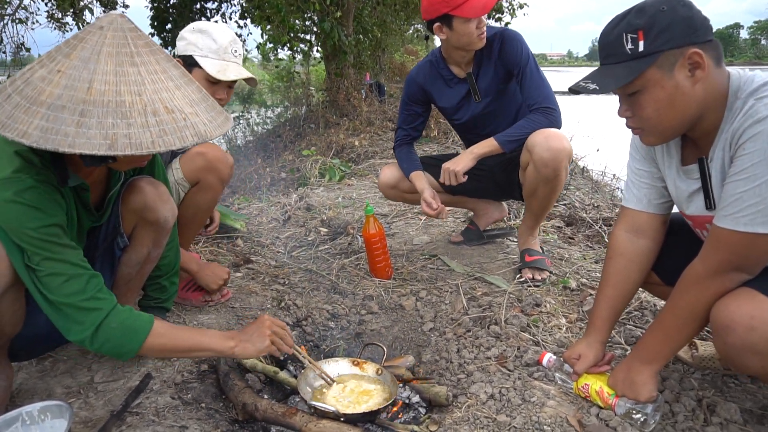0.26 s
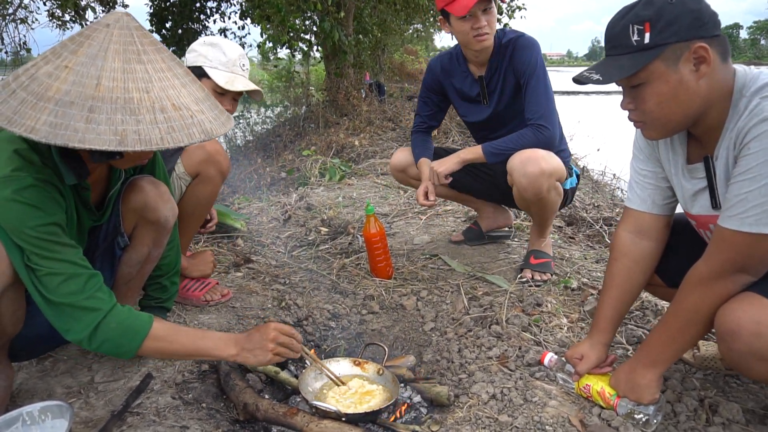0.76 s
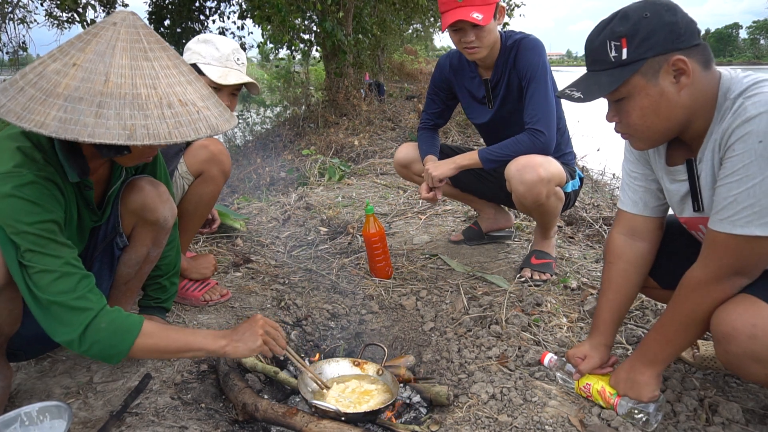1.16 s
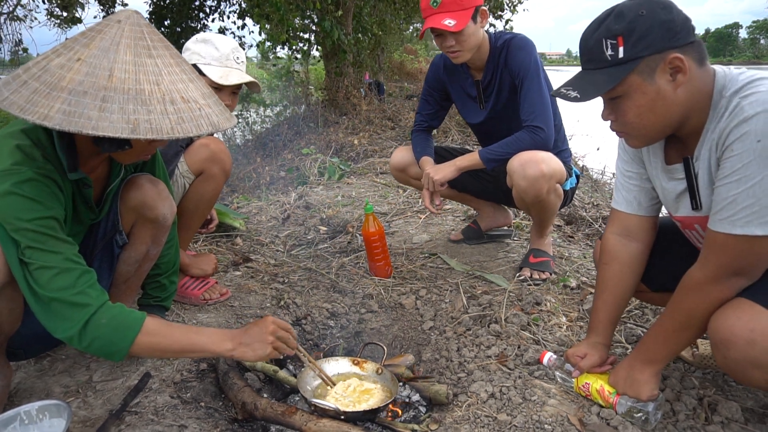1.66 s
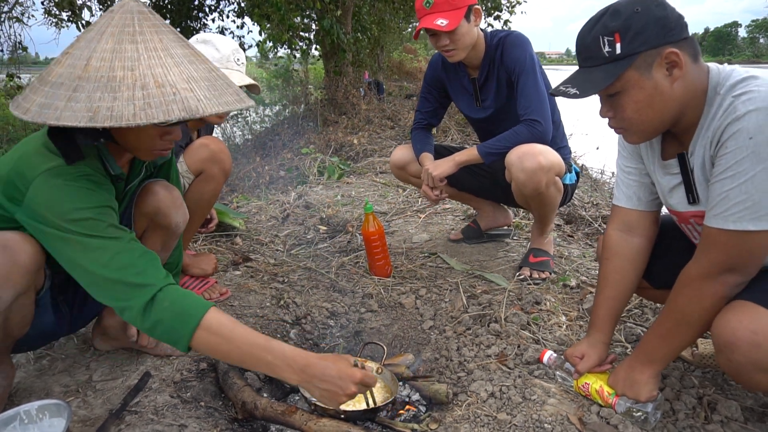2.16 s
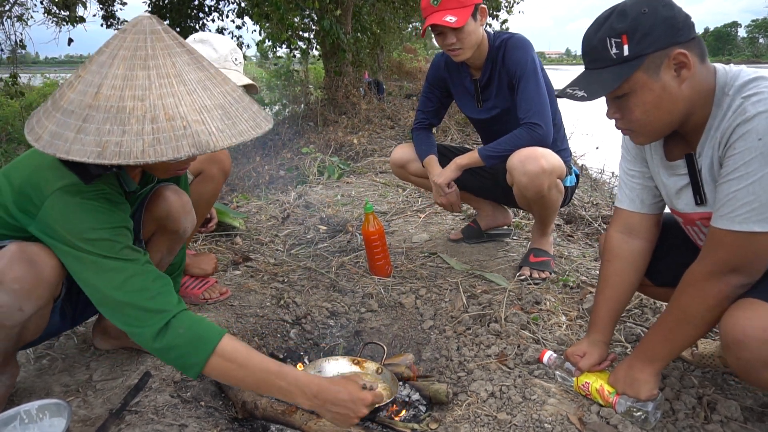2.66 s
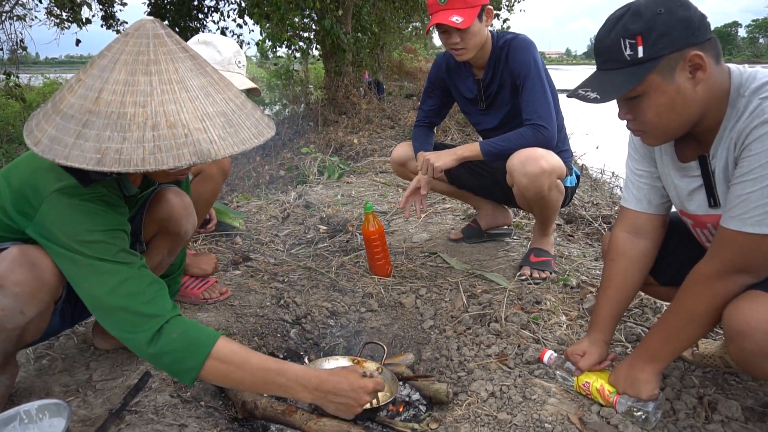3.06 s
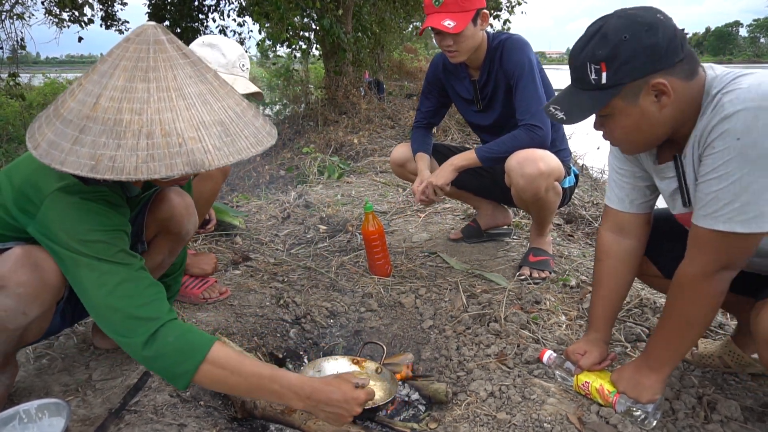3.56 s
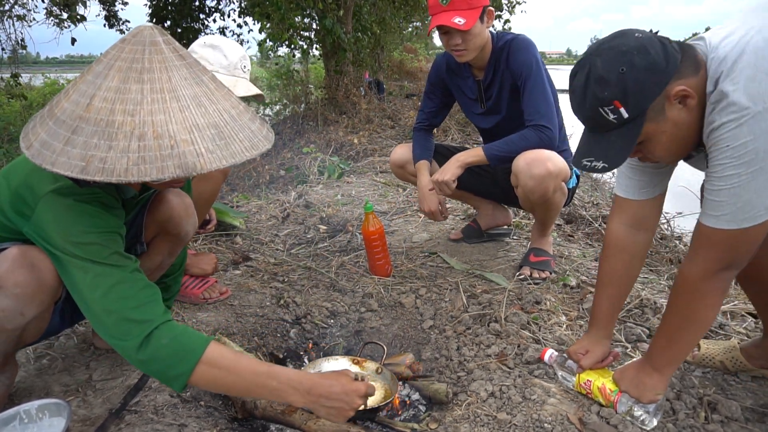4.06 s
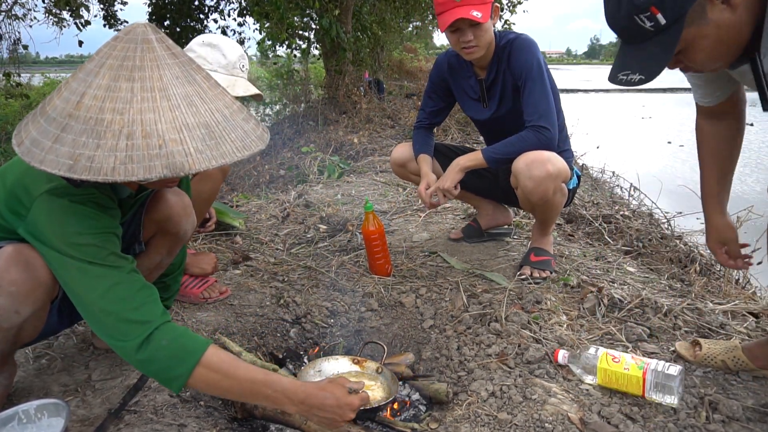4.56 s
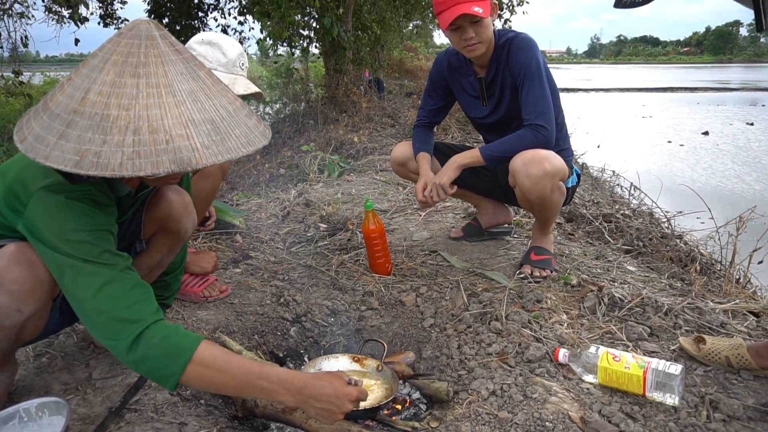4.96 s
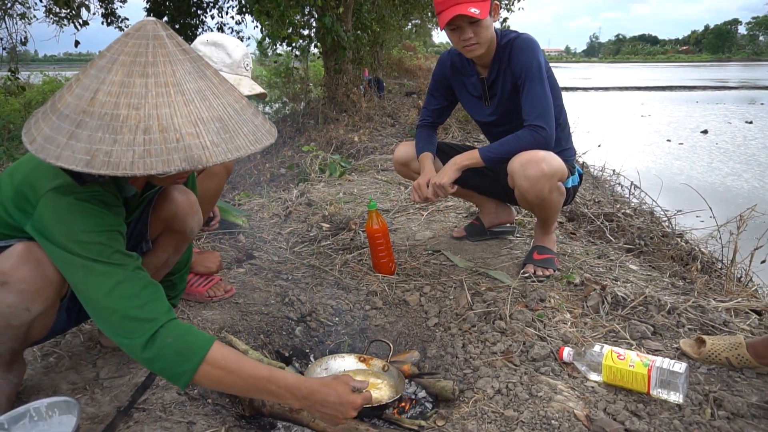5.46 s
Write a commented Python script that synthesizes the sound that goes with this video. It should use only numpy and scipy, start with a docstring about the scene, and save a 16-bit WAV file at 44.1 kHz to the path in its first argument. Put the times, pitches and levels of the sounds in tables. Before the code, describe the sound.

On open ground in a breeze, hot oil sizzles densely and bright bubbles pop, with a tight cluster of spits at about one second. Wind buffets the unprotected microphone in deep, ragged puffs, easing between about 3.4 and 4.3 seconds. In that lull a gripped plastic bottle pops and crunches hollowly in a fast flurry, followed by a few single buckles while frying and gusts continue.

```python
"""Egg frying outdoors in the wind

Egg fries in a small pan of oil, while gusts over a breeze buffet the microphone with rumble and flutter.
The sizzle is a dense scatter of tiny bubble bursts over shaped hiss; larger bubbles plip as damped
cavities and trapped water drops spit. Wet egg gives one short rush of steam as it is turned.
To the right a gripped thin plastic bottle buckles and crackles: ringing panels, noisy shell and ribs.
Shaped noise at two microphone ports makes the wind and the faint open-air background."""
import sys
import numpy as np
from scipy import signal
from scipy.fft import rfft, irfft, next_fast_len
from scipy.io import wavfile
from scipy.ndimage import uniform_filter1d

SR = 44100
rng = np.random.default_rng(int(sys.argv[2]) if len(sys.argv) > 2 else 0)


def dump_mix(stems):
    """Bounce the given channels to the path in sys.argv[1] as a 16-bit WAV at rate SR."""
    frames = np.atleast_2d(stems).T  # one column per channel
    limited = np.clip(frames, -1, 1)  # hard clip at full scale
    pcm = np.round(limited * 32767).astype(np.int16)
    wavfile.write(sys.argv[1], SR, pcm)


N = 252207
TIME = np.arange(N) / SR
SHORT = np.arange(3072) / SR  # time axis of one brief sound, s
EDGE_HZ = 15750  # top of the band

# Open-air background spectrum. Each row: frequency in Hz, relative level in dB.
AIR_SPECTRUM = [(100, 3), (300, -3.5), (600, 4), (1200, -0.5), (2500, -1), (6000, -66)]
# How alike wind and air noise are at the two ports. Each row: frequency in Hz, left-right correlation.
PORT_CORRELATION = [(25, 0.78), (60, 0.75), (130, 0.68), (290, -0.17), (640, 0.058), (2000, 0.67)]
# How differently the ports hear scattered sound. Each row: frequency in Hz, difference in dB.
SCATTER_DIFFERENCE = [(500, -9), (2000, -27), (4500, 0.5), (8000, 0.5)]

# Breeze between gusts. Each row: time in seconds, rumble level in dB before the wind's trim.
BREEZE_CURVE = [(0, -30), (2.4, -31.5), (3.3, -29.5), (3.78, -38.5), (4.15, -32), (4.5, -30.5),
                (5.72, -25.5)]
# Gusts that hit the microphone. Each row: start in seconds, length in seconds,
# rumble level in dB before the wind's trim, raggedness in dB (extra drive to the flutter).
GUST_EVENTS = [(0.0, 0.21, -24, -4), (0.201, 0.17, -23.5, -1), (0.577, 0.068, -23, -4),
               (0.681, 0.083, -21.5, -5.5), (0.842, 0.095, -18.5, 0), (0.975, 0.087, -21, -6),
               (1.161, 0.32, -18, -2.5), (1.485, 0.099, -23.5, -4.5), (1.799, 0.067, -18, -7),
               (1.915, 0.066, -19, 3), (2.015, 0.19, -21, -1), (2.463, 0.14, -23, -2.5),
               (2.534, 0.48, -18.5, 1), (3.065, 0.018, -21, 3), (3.148, 0.014, -20.5, 3),
               (3.325, 0.011, -20.5, 3), (4.343, 0.23, -22.5, 1.5), (4.604, .06, -23.5, -2.5),
               (4.761, 0.17, -24, -1.5), (4.997, 0.11, -18.5, -3), (5.185, 0.15, -19.5, -1.5),
               (5.373, 0.34, -20, 1)]
# Large-eddy rumble spectrum. Each row: frequency in Hz, relative level in dB.
RUMBLE_SPECTRUM = [(11, -44), (18, -7.5), (43, -1.5), (76, 1), (130, -2.5), (168, -10), (199, -13),
                   (260, -14), (340, -32.5), (570, -120)]
# Small-eddy flutter spectrum. Each row: frequency in Hz, relative level in dB.
FLUTTER_SPECTRUM = [(90, -24), (150, -20.5), (195, 4.5), (270, 0), (380, -9), (550, -17), (800, -27),
                    (1400, -68), (3000, -86)]
GUST_RISE_S, GUST_FALL_S = 0.029, 0.022  # length of the linear rise, time constant of the fall
# flutter level at this drive level; dB gained per dB of drive
FLUTTER_DB, FLUTTER_AT_DB, FLUTTER_GROWTH = -26, -19, 1.283

# Buckles of the bottle's wall. Each row: time in seconds, wide panel level in dB, its pitch in Hz,
# small panel level in dB, its pitch in Hz, crack level in dB; levels are before the bottle's trims.
BUCKLE_EVENTS = [(1.774, -12.5, 1020, -28, 2200, -44), (2.175, -19.5, 1065, -17, 3080, -16),
                 (3.338, -29, 1170, -25, 3460, -24), (3.473, -30, 1030, -34, 2650, -26),
                 (3.593, -24.5, 1010, -24, 2400, -46), (3.635, -24, 1100, -33, 4530, -24.5),
                 (3.696, -27, 800, -25, 2800, -42), (3.744, -27, 1250, -48, 2920, -40),
                 (4.13, -20, 695, -25.5, 1870, -37), (4.1406, -25, 1250, -25, 3800, -10.5),
                 (4.16, -12.5, 670, -22.5, 2160, -12), (4.206, -16.5, 1150, -30, 2140, -19),
                 (4.2124, -11, 1220, -19, 1790, -38), (4.2284, -10.5, 628, -22, 2430, -40),
                 (4.2488, -6.5, 892, -19, 2490, -42), (4.2877, -14, 730, -15, 3400, -26),
                 (4.3018, -20, 754, -11.5, 2330, -13), (4.455, -16, 1260, -13, 2310, -28),
                 (4.689, -19, 1363, -17, 1880, -17), (4.919, -9.5, 880, -15.5, 2260, -38)]
# Crowded modes of the bottle's shell. Each row: frequency in Hz, relative level in dB.
SHELL_SPECTRUM = [(200, -14), (420, -3), (620, 2), (900, -7), (1300, -4.5), (1700, -22.5), (2600, -55)]
# Crowded modes of the bottle's ribs. Each row: frequency in Hz, relative level in dB.
RIB_SPECTRUM = [(900, -62), (1600, 15), (2300, 24), (3300, 10), (4500, -5.5), (7000, -91)]
# Crack of a buckle. Each row: frequency in Hz, relative level in dB.
CRACK_SPECTRUM = [(1500, -48), (3500, 21.5), (5500, 13), (7500, 9), (10000, 2), (16000, -38)]

# Wet egg hissing on hot metal. Each row: time in seconds, level in dB before the steam trim.
STIR_CURVE = [(2.45, -99), (2.6, -43.5), (2.7, -36.5), (2.78, -39.5), (2.83, -52)]
# Tiny steam bursts. Each row: frequency in Hz, relative level in dB.
STEAM_SPECTRUM = [(1500, -27), (3000, -8), (5000, 3), (8000, -10.5), (11000, -13), (16000, -35)]

# Fine hiss of the oil. Each row: frequency in Hz, relative level in dB.
HISS_SPECTRUM = [(700, -42), (1500, -4.5), (2300, 2), (3300, 8), (4800, 1.5), (6500, 3), (8500, 1),
                 (11000, -0.5), (15500, -4.5)]
# Small bubble bursts in the oil. Each row: frequency in Hz, gain in dB.
GRAIN_SPECTRUM = [(600, -1), (1500, -2), (3300, 4), (5000, 4.5), (8000, -0.5), (11000, -8), (15500, -11)]
# Filter that picks out the finest fizz. Each row: frequency in Hz, gain in dB.
FIZZ_BAND = [(6500, -50), (8000, -12), (10000, 0)]
# The oil boils up for a moment. Each row: centre in seconds, half width in seconds, dB above the simmer.
BOIL_SURGES = [(0.02, 0.044, 5.5), (.78, 0.17, 3), (1.68, 0.21, 1), (4.06, 0.24, 3), (4.78, 0.25, 4),
               (5.53, 0.3, 3)]
SIMMER_DB = -42.5  # gain of the whole sizzle between surges
# turning the egg damps the finest fizz, which then creeps back; both times are time constants
FIZZ_DB, TURN_S, DAMP_DB, DAMP_S, RECOVER_S = 2.26, 2.7, -4, 0.074, 4.8

# Largest bubbles bursting. Each row: time in seconds, level in dB before the plip trim, pitch in Hz.
PLIP_EVENTS = [(0.051, -15.5, 3510), (0.3404, -18, 3300), (0.575, -25.5, 2860), (0.631, -20, 2770),
               (0.7184, -16.5, 2470), (0.7424, -17.5, 3640), (0.7736, -16, 2090), (0.7882, -20, 3460),
               (0.856, -14.5, 3580), (0.989, -19.5, 2420), (1.302, -23, 3580), (1.3897, -18.5, 3040),
               (1.5662, -24, 2510), (1.694, -19, 3460), (1.7986, -16.5, 3500), (1.914, -21.5, 2360),
               (1.9599, -21, 3030), (2.271, -23.5, 3280), (2.3675, -22.5, 3520), (3.5688, -19.5, 3100),
               (3.913, -18.5, 4820), (3.962, -19, 2610), (4.791, -19.5, 3460), (5.0687, -19.5, 3480),
               (5.323, -24.5, 2500), (5.6016, -17, 3400), (5.627, -19, 3250)]
# Sharp spits of oil. Each row: time in seconds, level in dB before scatter, pitch in Hz.
SPIT_EVENTS = [(0.468, -14, 3220), (1.0566, -13, 5200), (1.0608, -11, 3330), (1.071, -9, 5270),
               (1.2484, -13, 3300), (1.2646, -14.5, 7260), (1.517, -12.5, 5030), (1.5786, -17, 4800),
               (3.9226, -23, 3350), (5.4914, -7.5, 7100)]
# Tick of a spit. Each row: frequency in Hz, gain in dB.
SPIT_SPECTRUM = [(1000, -24), (3000, -11.5), (6000, 4.0), (10000, -8), (16000, -6)]
# middling bubbles burst at random, louder when the oil boils up; levels are before the plip trim
PLIPS_PER_S, PLIP_DB, PLIP_SPREAD_DB = 9, -27, 2.5
PLIP_HZ, PLIP_OCTAVES = 3200, .4  # centre pitch, spread to either side


def gain_of(db):
    """Decibels to amplitude."""
    return 10 ** (np.asarray(db) / 20)


def evened(x):
    """Scales to rms 1."""
    return x / np.sqrt(np.mean(x ** 2) + 1e-20)


def peaked(x):
    """Scales to peak 1."""
    return x / (abs(x).max() + 1e-20)


def read(points, hz):
    """Reads a spectrum table on a log-frequency axis."""
    f, value = np.transpose(points)
    return np.interp(np.log(hz + 1), np.log(f + 1), value)


def follow(rows):
    """The columns of a curve table at every sample."""
    s, *columns = np.transpose(rows)
    return [np.interp(TIME, s, c) for c in columns]


def colour(x, points):
    """Filters by a spectrum table."""
    length = x.shape[-1]
    size = next_fast_len(length + 1024)
    gains = gain_of(read(points, np.fft.rfftfreq(size, 1 / SR)))
    return irfft(rfft(x, size) * gains, size)[..., :length]


def steadied(x, size):
    """Takes the slow swells out of a two-port noise."""
    return x / np.sqrt(uniform_filter1d((x ** 2).mean(0), size) + 1e-9)


def slow_noise(size, limit):
    """Smoothed noise of rms 1, clipped at the limit."""
    return np.clip(evened(uniform_filter1d(rng.standard_normal(N), size=size)), -limit, limit)


def add(mix, s, sound):
    """Mixes a sound in at time s."""
    part = mix[..., max(round(s * SR), 0):][..., :sound.shape[-1]]
    part += sound[..., :part.shape[-1]]


def dying(t60):
    """Exponential decay, 60 dB down after t60 seconds."""
    return np.exp(-np.log(1000) * SHORT / max(t60, 1e-4))


def burst(t60, attack=.0002):
    """A puff of white noise that swells over the attack and dies away."""
    return rng.standard_normal(len(SHORT)) * dying(t60) * (1 - dying(attack))


def ring(hz, t60, glide=0):
    """A damped sine whose pitch climbs by the share glide as it dies."""
    fade = dying(t60)
    return fade * np.sin(2 * np.pi * np.cumsum(hz * (1 + glide * (.5 - fade))) / SR)


def place(x, left_db, scatter_db, t60, onset=0.0066):
    """Direct sound plus a brief scatter off pan, ground and bodies, which differs mostly in treble by port."""
    common = burst(t60, onset)
    apart = colour(burst(t60, onset), SCATTER_DIFFERENCE)
    late = np.array([common + apart, common - apart])
    paths = gain_of(scatter_db) * late / np.linalg.norm(late[0])
    paths[:, 0] += 1  # direct sound
    balance = gain_of([[left_db / 2], [-left_db / 2]])
    return signal.oaconvolve(x[None], paths, axes=1)[:, :N] * balance


def port_noise(points):
    """Coloured noise at two ports, alike or unlike by frequency: large eddies reach both, small ones only one."""
    size = next_fast_len(N)
    hz = np.fft.rfftfreq(size, 1 / SR)
    mid, side = rfft(rng.standard_normal((2, size)))
    alike = np.clip(read(PORT_CORRELATION, hz), -1, 1)
    mid, side = mid * np.sqrt(1 + alike), side * np.sqrt(1 - alike)
    ports = np.array([mid + side, mid - side]) * gain_of(read(points, hz))
    return evened(irfft(ports, size)[:, :N])


def open_air():
    """The steady outdoor background: faint noise, shaped by frequency and partly shared by the ports."""
    return gain_of(-48) * port_noise(AIR_SPECTRUM)


def wind_levels():
    """Each gust rises, holds and falls over the breeze; flutter grows faster in dB than rumble."""
    rumble = drive = follow(BREEZE_CURVE)[0]
    for s, length, db, ragged_db in GUST_EVENTS:
        rise = np.clip((TIME - s) / GUST_RISE_S + .5, 0, 1)
        fall = np.exp(-np.maximum(TIME - s - length, 0) / GUST_FALL_S)
        gust = db + 20 * np.log10(rise * fall + 1e-9)
        rumble = np.maximum(rumble, gust)
        drive = np.maximum(drive, gust + ragged_db)
    return rumble, FLUTTER_DB + FLUTTER_GROWTH * (drive - FLUTTER_AT_DB)


def wind(rumble_trim_db=0.52, puff_db=3.5):
    """Large eddies rumble; small ones break off in bursts on their pressure peaks and come in puffs."""
    rumble_db, flutter_db = wind_levels()
    eddies = steadied(port_noise(RUMBLE_SPECTRUM), size=3000)
    bursts_db = 4.5 * np.clip(eddies, -2, 2)
    puffs = slow_noise(size=700, limit=2)
    flutter = port_noise(FLUTTER_SPECTRUM) * gain_of(bursts_db + puff_db * puffs)
    flutter = steadied(flutter, size=4000)
    return gain_of(rumble_db + rumble_trim_db) * eddies + gain_of(flutter_db) * flutter


def wide_panel(hz, level_db, shell_db):
    """A wide panel snaps through and shakes the shell; snapped hard it stays taut and rings on."""
    t60 = .03 * np.exp(.025 * (level_db + 16))
    shell = peaked(colour(burst(.012) + .4 * burst(.04), SHELL_SPECTRUM))
    # modes far below the panel's pitch are shaken less
    shell = colour(shell, [(.5 * hz, -11), (.85 * hz, 0)])
    return peaked(ring(hz, t60, glide=0.11) + gain_of(shell_db) * shell)


def small_panel(hz, ribs_db, t60=0.025):
    """A small panel rings briefly and shakes the crowded modes of the ribs."""
    ribs = peaked(colour(burst(t60), RIB_SPECTRUM))
    return peaked(ring(hz, t60, glide=0.02) + gain_of(ribs_db) * ribs)


def bottle(level_db=1.5, shell_db=2, ribs_db=0.5, crack_db=1.0):
    """Each buckle snaps a wide and a small panel through, shakes shell and ribs, and gives off a crack."""
    out = np.zeros((2, N))
    for s, wide_db, wide_hz, small_db, small_hz, tick_db in BUCKLE_EVENTS:
        wide = gain_of(wide_db) * wide_panel(wide_hz, wide_db, shell_db)
        small = gain_of(small_db) * small_panel(small_hz, ribs_db)
        crack = peaked(colour(burst(0.0021) + 0.29 * burst(0.011), CRACK_SPECTRUM))
        snap = small + gain_of(tick_db + crack_db) * crack
        left, right = place(wide, left_db=-1.4, scatter_db=-16, t60=.04)
        # the wide panel reaches the right port first, by 6 samples
        add(out, s, np.array([np.roll(left, shift=6), right]))
        add(out, s, place(snap, left_db=-1.8, scatter_db=-10, t60=.035))
    return gain_of(level_db) * out


def stir(steam_db=1):
    """A short rush of tiny steam bursts as wet egg is pushed onto hot metal."""
    sizes = gain_of(5.5 * np.minimum(rng.exponential(1, N), 4))
    bursts = (rng.random(N) < 1500 / SR) * rng.choice([-1, 1], N) * sizes  # 1500 a second on average
    steam = colour(bursts, STEAM_SPECTRUM)
    active = (TIME > STIR_CURVE[0][0]) * (TIME < STIR_CURVE[-1][0])
    level = gain_of(follow(STIR_CURVE)[0] + steam_db) * active
    return level * evened(place(steam, left_db=4, scatter_db=-3, t60=.02))


def bubble(hz, cycles, film_db, glide, overtone_db=-15, rough=0.49):
    """The film tears with a fizz and shakes the cavity, whose pitch climbs as the hole widens."""
    t60 = cycles / hz
    tear = burst(0.0067)
    overtone = gain_of(overtone_db) * (hz < 7000) * ring(1.98 * hz, .5 * t60, glide)
    cavity = ring(hz, t60, glide) * (1 - dying(.15 * t60)) + overtone
    kick = rough * tear[:256] / np.linalg.norm(tear)
    kick[0] += 1
    shaken = peaked(signal.lfilter(kick, [1], cavity))
    fizz = peaked(signal.lfilter([1, -1], [1, -1, .3], tear))
    return peaked(shaken + gain_of(film_db) * fizz)


def surge_db(t):
    """How far the oil boils above its simmer at time t, as a sum of bell-shaped swells."""
    return sum(db * np.exp(-((t - s) / width) ** 2) for s, width, db in BOIL_SURGES)


def fizz_db():
    """Gain of the finest fizz: it drops as the egg is turned, then creeps back."""
    since = np.maximum(TIME - TURN_S, 0)
    return FIZZ_DB + DAMP_DB * (1 - np.exp(-since / DAMP_S)) * np.exp(-since / RECOVER_S)


def sizzle_grains(clusters_db, per_s=1500, spread_db=5.0, count=64):
    """Small bubbles of many pitches burst at random, each pitch with its own tick and scatter."""
    grains = np.zeros((2, N))
    for hz in np.geomspace(2400, 12000, count):
        chance = rng.random(N)
        size = np.minimum(rng.exponential(1, N), 5.2)
        bursts = (chance < per_s / count / SR) * gain_of(spread_db * size + clusters_db)
        tick = bubble(hz, cycles=14.8, film_db=-4.5, glide=0.2)
        grain = place(tick, left_db=5.5, scatter_db=-4, t60=.018)
        grain = grain[:, :1024] / np.linalg.norm(grain)
        grains += signal.oaconvolve(bursts[None], grain, axes=1)[:, :N]
    return evened(colour(grains, GRAIN_SPECTRUM))


def sizzle(cluster_db=4.5, grains_db=2, hiss_db=-6, hiss_cluster=0.25):
    """Small bubbles burst in clusters over a fine hiss; both follow the boil."""
    clusters_db = cluster_db * slow_noise(size=500, limit=2.2)
    grains = sizzle_grains(clusters_db)
    hiss = colour(rng.standard_normal(N), HISS_SPECTRUM) * gain_of(hiss_cluster * clusters_db)
    hiss = evened(place(hiss, left_db=5.5, scatter_db=5, t60=.025))
    oil = gain_of(grains_db) * grains + gain_of(hiss_db) * hiss
    finest = colour(oil, FIZZ_BAND)
    return gain_of(SIMMER_DB + surge_db(TIME)) * (oil + finest * (gain_of(fizz_db()) - 1))


def middling_plips(count=120):
    """Rows of time in seconds, level in dB and pitch in Hz for bubbles that burst at random intervals."""
    draws = rng.random((count, 3))
    times = np.cumsum(-np.log(1 - draws[:, 0])) / PLIPS_PER_S
    size, pitch = 2 * draws[:, 1:].T - 1
    levels = PLIP_DB + PLIP_SPREAD_DB * size + .5 * surge_db(times)
    pitches = PLIP_HZ * 2 ** (PLIP_OCTAVES * pitch)
    return [row for row in zip(times, levels, pitches) if row[0] < N / SR]


def spits(lag=.0005):
    """Trapped water drops spit with a hard, bright tick, a bubble's ring and a brief spray."""
    out = np.zeros((2, N))
    for s, db, hz in SPIT_EVENTS:
        tick = peaked(colour(burst(0.0012), SPIT_SPECTRUM))
        spit = peaked(tick + .5 * bubble(hz, cycles=17, film_db=-18, glide=0.039))
        add(out, s + lag, gain_of(db) * place(spit, left_db=3.5, scatter_db=-2, t60=0.029))
    return out


def plips(plip_db=4.0, lag=.0005):
    """Large and middling bubbles plip: each torn film sets its cavity ringing."""
    out = np.zeros((2, N))
    for s, db, hz in list(PLIP_EVENTS) + middling_plips():
        plip = bubble(hz, cycles=19.3, film_db=-8, glide=0.011)
        add(out, s + lag, gain_of(db + plip_db) * place(plip, left_db=3, scatter_db=-9, t60=.035))
    return out


def scene():
    """Open air, wind, the bottle and the frying pan."""
    pan = stir() + sizzle() + spits() + plips()
    return open_air() + wind() + bottle() + pan


def record(dry):
    """Limits the band with a steep linear-phase low-pass."""
    low_pass = signal.firwin(255, EDGE_HZ, window=("kaiser", 9), fs=SR)
    return signal.oaconvolve(dry, low_pass[None], "same")


dry = scene()
out = record(dry)
dump_mix(out)
```